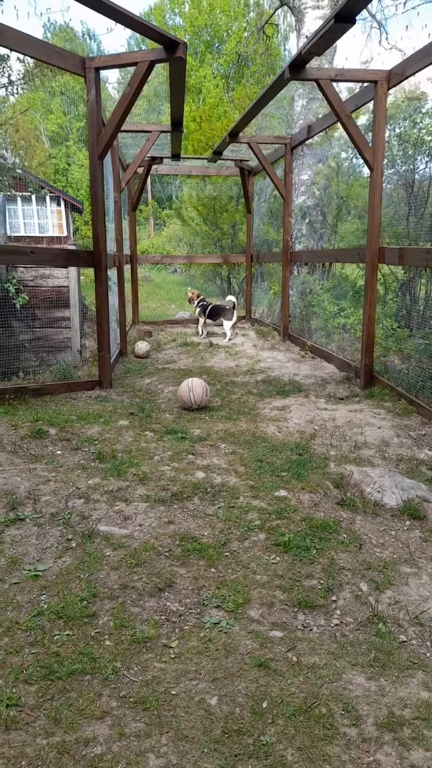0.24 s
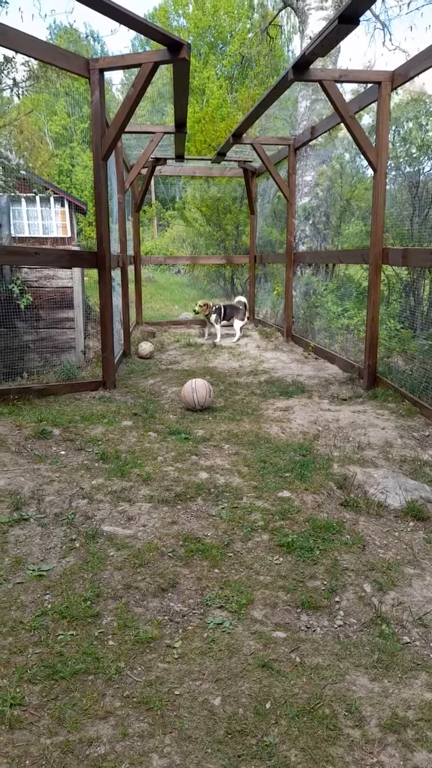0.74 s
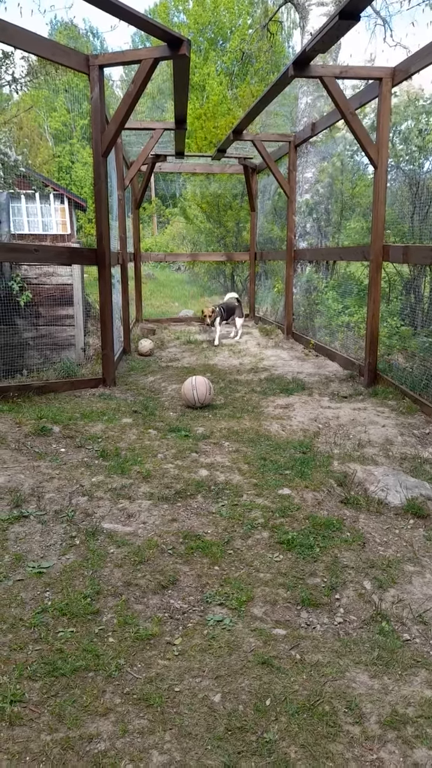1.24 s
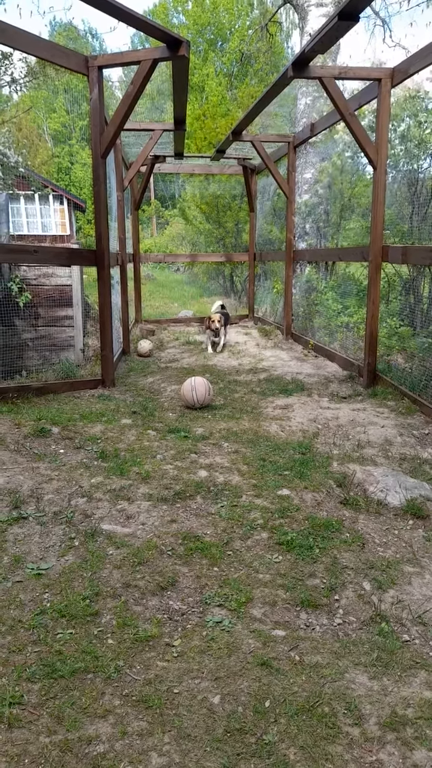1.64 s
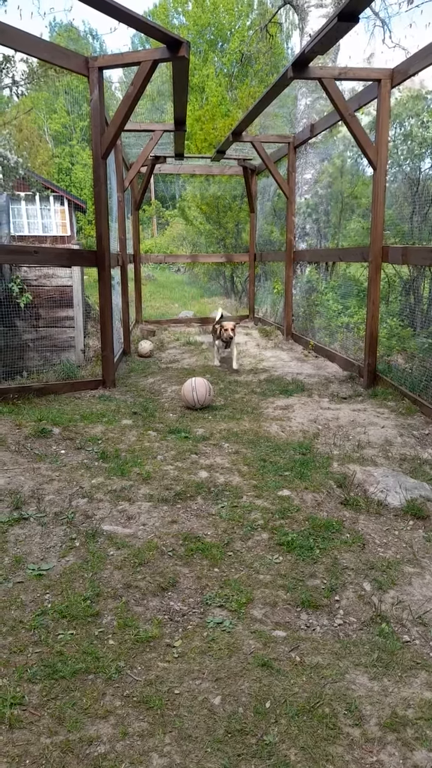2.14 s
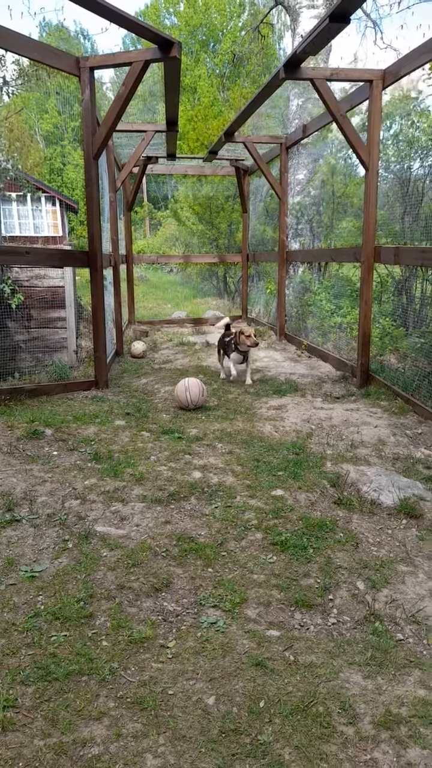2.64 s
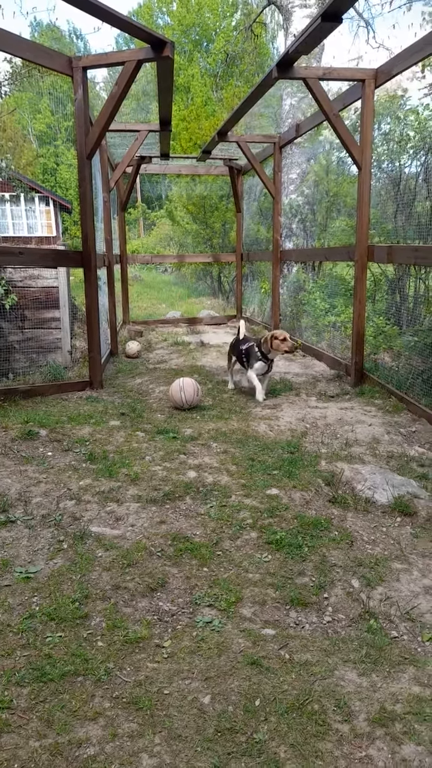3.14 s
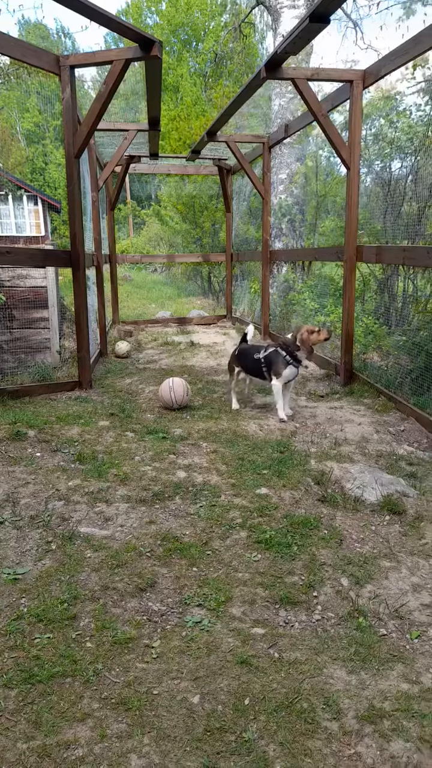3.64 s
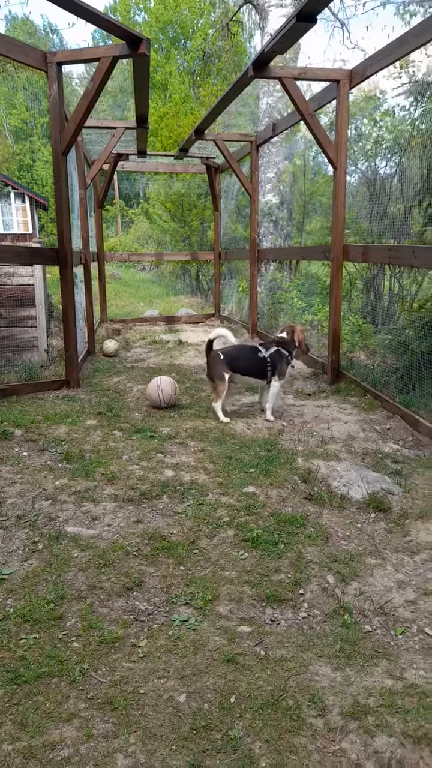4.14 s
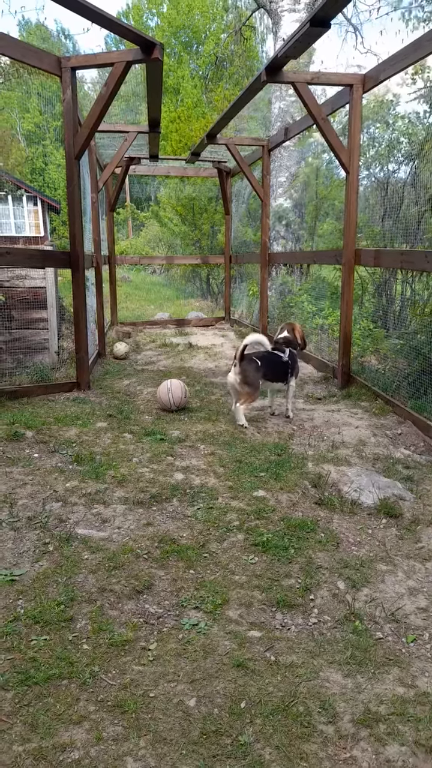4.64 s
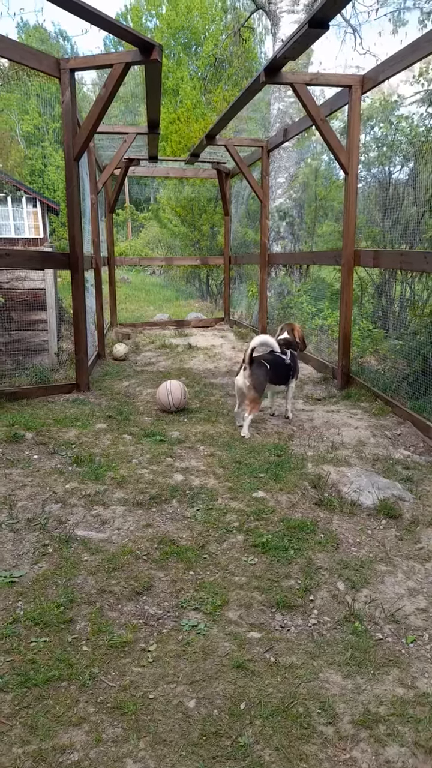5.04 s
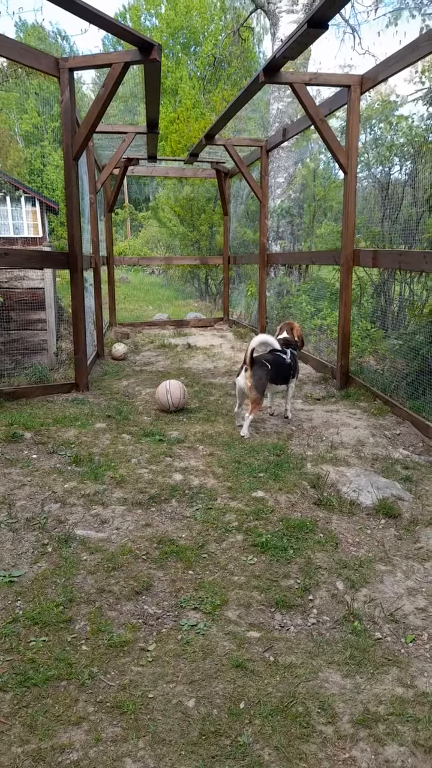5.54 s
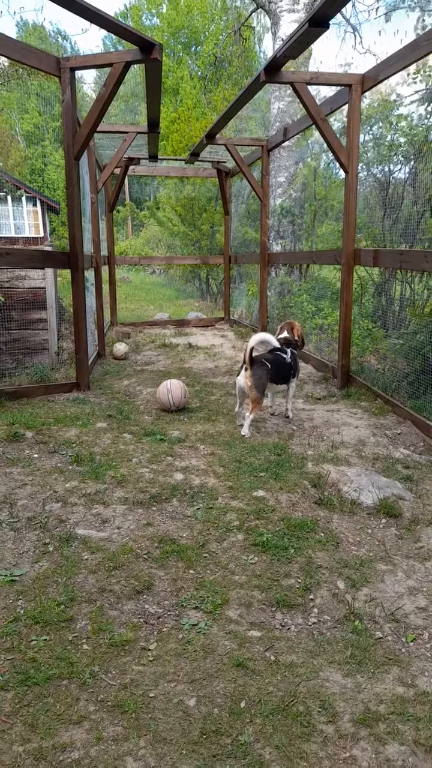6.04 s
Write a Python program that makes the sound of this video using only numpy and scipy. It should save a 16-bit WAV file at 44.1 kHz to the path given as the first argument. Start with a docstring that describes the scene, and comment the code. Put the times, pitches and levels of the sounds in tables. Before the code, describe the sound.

A dog's bay dominates the opening: a sudden high, cracking call, a quick second lower one, then a trailing growl. The rest is quiet: a short rumbling grumble, paws on earth, twig ticks, thin metallic collar jingles, then a long grumble that rises slightly and sags away. Gentle wind in leaves and faint bird whistles surround it. Open garden, short diffuse reflections, dog at a distance from a phone microphone.

```python
"""A small hound in an outdoor fenced run: a grumble breaks into a double bay, then two long closed-mouth grumbles.
A low rumble goes with the grumbles; collar tags tinkle, twigs tick, paws thud, a bird chirps, leaves rustle in wind.
The voice is harmonics, halfway lines and throat-shaped rasp; the bay adds pulses and second notes.
Tags, twigs and paws are decaying tones, chirps gliding tones, rustle and rumble shaped stereo noise.
Nearby walls and trees answer the voice with a decaying noise tail; a far slope returns the bay once, dulled."""
import sys
import numpy as np
from scipy import signal
from scipy.fft import rfft, irfft, next_fast_len
from scipy.io import wavfile
from scipy.ndimage import uniform_filter1d, map_coordinates

SR = 44100
rng = np.random.default_rng(int(sys.argv[2]) if len(sys.argv) > 2 else 0)


def unload_audio(sound):
    """Save the sound as a 16-bit wav file, at the path given as the first command line argument."""
    columns = np.transpose(np.atleast_2d(sound))
    # keep every value between -1 and 1, then stretch to whole-number steps
    steps = np.round(np.clip(columns, -1, 1) * 32767)
    wavfile.write(sys.argv[1], SR, steps.astype(np.int16))


N = 277389

# Open throat and mouth, resonances: (centre [Hz], width of one pass [Hz], level [dB])
THROAT_MODES = [(310, 95, -9.5), (542, 150, 7), (890, 140, -3.5), (1204, 67, -0.5), (1490, 100, -11.5),
                (1786, 50, -15.5), (2185, 40, -23), (3060, 47, -35.5), (3540, 230, -27), (4550, 180, -28.5),
                (6200, 340, -33.5)]
# Stereo likeness of the rustle: (frequency [Hz], left-right correlation [-1..1])
PORT_LIKENESS = [(30, .3), (70, 0.94), (180, 1), (550, 0.74), (1650, 0.7), (5000, 0.067), (15000, 0.067)]


def amp(db):
    """Gain of a level in dB."""
    return 10 ** (np.asarray(db) / 20)


def unit(x):
    """x at rms 1."""
    return x / np.sqrt(np.mean(x ** 2) + 1e-20)


def along(points, hz):
    """(Hz, value) points interpolated on a log frequency axis."""
    f, v = np.transpose(points)
    return np.interp(np.log(hz + 1), np.log(f + 1), v)


def curves(rows):
    """One value per sample for each column after the time."""
    s, *cols = np.transpose(rows)
    return [np.interp(np.arange(N) / SR, s, c) for c in cols]


def wobble(rate_hz):
    """A smooth random curve with rate_hz knots a second."""
    knots = rng.standard_normal(int(N * rate_hz / SR) + 4)
    return map_coordinates(knots, [np.arange(N) * rate_hz / SR])


def filtered(x, response):
    """x times a complex response of frequency."""
    m = next_fast_len(N + SR)
    return irfft(rfft(x, m) * response(np.fft.rfftfreq(m, 1 / SR)), m)[..., :N]


def resonances(modes):
    """Response of summed resonances, each applied twice for dark valleys."""
    def response(f):
        return sum(amp(db) * (1j * f * w / (c * c - f * f + 1j * f * w)) ** 2 for c, w, db in modes)
    return response


def rush(spectrum, patchy_db, alike=PORT_LIKENESS):
    """Stereo noise with patches of random gain; the mean of its channels has rms 1."""
    # Port balance: (frequency [Hz], left minus right [dB])
    tilt = [(30, 1), (70, -0.5), (180, -4), (550, -1.5), (1650, 0), (5000, -2.5), (15000, 4.5)]
    port_gap_samples = 6  # left leads
    z = signal.stft(rng.standard_normal((2, N)), nperseg=512)[2]
    field = uniform_filter1d(rng.standard_normal(z.shape[1:]), size=6, axis=0)
    patches = unit(uniform_filter1d(field, size=14, axis=1))
    pair = signal.istft(z * amp(patchy_db * patches), nperseg=512)[1][:, :N]

    def mid_side_gains(hz):
        turn = np.arccos(np.clip(along(alike, hz), -1, 1)) / 2
        return amp(along(spectrum, hz)) * np.array([np.cos(turn), np.sin(turn)])

    mid, side = filtered(pair, mid_side_gains)
    left, right = filtered(np.array([mid + side, mid - side]),
                           lambda hz: amp(along(tilt, hz) / 2 * [[1], [-1]]))
    both = np.array([left, np.roll(right, port_gap_samples)])
    return both / np.std(both.mean(0))


def foliage():
    """Turbulent rustle: one wind strength stirs near leaves, their top hiss and far trees."""
    # Near leaves: (time [s], level [dB])
    strength = [(0.0, -62.5), (.47, -63.5), (1.05, -65), (1.2, -67.5), (1.61, -67), (1.89, -62),
                (2.31, -61), (2.43, -63.5), (2.82, -63.5), (3.1, -65.5), (3.56, -63.5), (4.03, -62),
                (4.41, -64.5), (4.9, -65.5), (5.1, -67.5), (5.75, -68.5), (6.29, -69)]
    # Noise shapes of far trees, near leaves and top hiss: (frequency [Hz], relative level [dB])
    trees_shape = [(88, -31), (150, -16.5), (270, -5.5), (326, -0.5), (380, -3.5), (744, -3), (817, -5.5),
                   (1340, -9.5), (2500, -20), (3250, -45), (5500, -120)]
    leaves_shape = [(880, -14.5), (1500, -13), (2020, -6.5), (2430, -6.5), (3090, -4.5), (3500, -6.5),
                    (4050, -5.5), (4830, -7.5), (6280, -7.5), (8600, -30), (11200, -40), (18900, -120)]
    hiss_shape = [(4410, -9.5), (7500, -4.5), (8540, -10), (10600, -6), (12600, -6), (14600, -6.5),
                  (15100, -11), (15700, -9)]
    # growth: dB per dB of swing of the near leaves
    trees_db, trees_growth, trees_drift_db_per_s = -60, 0.68, 0.7456
    hiss_db, hiss_growth, hiss_drift_db_per_s = -67.5, 1.1, -.5
    leaves_db, = curves(strength)
    swing_db, t = leaves_db - leaves_db.mean(), np.arange(N) / SR
    gust = wobble(6.9)
    trees_level_db = trees_db + trees_growth * swing_db + trees_drift_db_per_s * t + 0.24 * gust
    leaves_level_db = leaves_db + 0.18 * gust
    hiss_level_db = hiss_db + hiss_growth * swing_db + hiss_drift_db_per_s * t + .7 * gust
    hiss_level_db = hiss_level_db + 0.56 * wobble(5.4)
    return (amp(trees_level_db) * rush(trees_shape, patchy_db=-0.08)
            + amp(leaves_level_db) * rush(leaves_shape, patchy_db=1.8)
            + amp(hiss_level_db) * rush(hiss_shape, patchy_db=1.7))


def bird():
    """Faint whistles from the trees: short gliding tones with a wandering phase."""
    # (time [s], length [s], start pitch [Hz], end pitch [Hz], level [dB])
    chirps = [(.3, 0.067, 6270, 6140, -63), (3.183, 0.022, 4370, 4000, -65), (3.205, .07, 3820, 4180, -68),
              (3.565, 0.016, 4300, 4100, -61), (2.932, 0.054, 2730, 2660, -68),
              (3.132, .05, 2700, 2650, -66)]
    out = np.zeros(N)
    for s, length_s, from_hz, to_hz, db in chirps:
        u = np.linspace(0, 1, round(length_s * SR))
        glide = 2 * np.pi * np.cumsum(from_hz + (to_hz - from_hz) * u) / SR
        wander = np.cumsum(rng.normal(0, 0.064, len(u)))
        out[round(s * SR):][:len(u)] += amp(db) * np.sin(np.pi * u) * np.sin(glide + wander)
    return out


def twigs():
    """Ticks: tones with a wandering phase that die within a few cycles."""
    # (time [s], level before the envelope [dB], centre [Hz])
    ticks = [(2.449, -34, 7000), (2.755, -46, 4800), (3.301, -34, 2360), (3.894, -33, 13000),
             (4.243, -54, 10980)]
    out, t = np.zeros(N + SR), np.arange(SR // 8) / SR
    for s, db, hz in ticks:
        wander = np.cumsum(rng.normal(0, 1.6 * hz / SR, len(t)))
        envelope = np.exp(-t * hz / 1.6) * np.tanh(t * hz / .5)
        out[round(s * SR):][:len(t)] += amp(db) * np.sin(2 * np.pi * hz * t + wander) * envelope
    return out


def paws():
    """Thuds on earth: damped tones with a soft onset."""
    # Level before a 6 dB lift and the envelope: (time [s], level [dB], pitch [Hz])
    thumps = [(1.619, -55, 96.9), (2.44, -47, 101.3), (2.48, -52, 73), (2.613, -47, 61.5),
              (2.717, -60, 110), (2.73, -52.5, 601), (2.81, -54, 90)]
    out, t = np.zeros(N + SR), np.arange(SR // 8) / SR
    envelope = np.exp(-t / 0.017) * (1 - np.exp(-t / 0.0069))
    for s, db, hz in thumps:
        out[round(s * SR):][:len(t)] += amp(db + 6.0) * np.sin(2 * np.pi * hz * t) * envelope
    return out


def collar_tags():
    """Metal tags ring high and short in three decaying modes, balanced anew at each touch."""
    # Level before a 1.5 dB lift and the onset: (time [s], level [dB], gain of the upper two modes [dB])
    touches = [(2.298, -60, -10), (2.648, -54, -3), (2.672, -64, -7), (3.088, -59, 3), (3.484, -60, 5),
               (3.522, -48.5, 14), (3.545, -53.5, 6), (3.575, -68, -5), (3.914, -60, -6), (4.01, -64, -8)]
    # (frequency [Hz], relative level [dB], t60 [s])
    modes = [(10420, 5, 0.083), (14000, 4, .065), (15300, 2, .065)]
    out, t = np.zeros(N + SR), np.arange(SR // 8) / SR
    onset = 1 - np.exp(-(t / .017) ** 2)
    for s, db, upper_db in touches:
        ring = np.zeros(len(t))
        for (hz, level_db, t60_s), gain_db in zip(modes, [0, upper_db, upper_db]):
            decay = amp(level_db + gain_db + rng.normal(0, 2.1) - 60 * t / t60_s)
            wander = np.cumsum(rng.normal(0, 0.078, len(t)))
            ring += decay * np.sin(2 * np.pi * hz * t + wander)
        out[round(s * SR):][:len(t)] += amp(db + 1.5) * ring * onset
    return out


def small_sounds():
    """Tags, twigs and paws reach the left port four samples before the right."""
    mono = collar_tags() + twigs() + paws()
    return np.array([mono[4:N + 4], mono[:N]])


def chest_rumble():
    """Low rumble: lumpy deep noise, strongest while the dog grumbles, probably from its chest."""
    # Level before a 5.5 dB lift: (time [s], level [dB])
    strength = [(0.0, -71), (.47, -70), (.88, -67.5), (1.05, -63), (1.17, -77), (1.5, -81), (1.79, -64),
                (2.1, -52), (2.43, -68.5), (2.82, -67), (3.08, -72.5), (3.56, -71), (4.03, -64),
                (4.41, -66), (4.59, -66), (4.9, -62.5), (5.1, -72), (6.29, -74)]
    # Noise shape: (frequency [Hz], relative level [dB])
    rumble_shape = [(12, -61), (20, -38.5), (51, -7.5), (97, 2), (118, 0.5), (140, -9), (171, -3.5),
                    (250, -23.5), (320, -25), (550, -120)]
    # (frequency [Hz], left-right correlation [-1..1])
    likeness = [(30, .3), (60, .55), (130, .9)]
    lumps = amp(4.0 * wobble(9))
    return amp(curves(strength)[0] + 5.5) * lumps * rush(rumble_shape, patchy_db=0.0, alike=likeness)


def yard(x, delay_s):
    """The diffuse answer of walls and trees; each frequency dies at its own speed."""
    # (frequency [Hz], t60 [s])
    decay = [(150, 0.054), (500, 0.42), (1500, 0.26), (6000, 0.089)]
    hz, t, z = signal.stft(rng.standard_normal((2, SR // 2)), SR, nperseg=256)
    tail = signal.istft(z * amp(-60 * t / along(decay, hz)[:, None]), SR, nperseg=256)[1]
    late = np.pad(x, (round(delay_s * SR), 0))[None]
    return signal.fftconvolve(late, tail / np.linalg.norm(tail[0]), axes=1)[:, :N]


def far_slope(x):
    """One late return, narrowed to a band round 510 Hz, with a flickering level."""
    def response(hz):
        band = 1 / (1 + (np.log(hz / 510 + 1e-9) / .11) ** 4)
        return np.exp(-2j * np.pi * hz * .68) * band  # 0.68 s late
    return filtered(x, response) * amp(3.7 * wobble(40.46))


def catches():
    """Gain of the voice: brief dips where the folds lose their swing."""
    # (time [s], half width to 1/e of the depth [s], depth [dB])
    breaks = [(0.213, 0.0032, 6.5), (0.23, 0.0057, 5.5), (.243, 0.0027, 2), (.33, 0.007, 14),
              (0.371, 0.0051, 14.5), (0.466, 0.0064, 5.5), (0.485, 0.0015, 7.5), (.499, 0.0014, 9),
              (0.513, 0.0062, 8.5), (0.533, 0.0047, 7.5), (0.543, 0.0013, 17.5), (.56, 0.009, 0.5),
              (0.613, 0.0087, 14), (0.631, 0.0025, 8.5), (0.647, .003, 4), (2.115, .012, 8)]
    t = np.arange(N) / SR
    return amp(-sum(abs(db) * np.exp(-((t - s) / width_s) ** 2) for s, width_s, db in breaks))


def second_notes(jitter):
    """A second steady pitch sounds briefly beside the gliding bay and beats with it."""
    # (time [s], length [s], pitch [Hz], peak level [dB])
    notes = [(.2, 0.064, 503.7, -21), (0.471, 0.088, 505.2, -21), (0.616, .05, 420.6, -26),
             (.665, 0.043, 410, -39)]
    out = np.zeros(N)
    unsteady, shimmer = 1 + jitter * wobble(90), amp(1.3 * wobble(70))
    for s, length_s, hz, db in notes:
        at = round(s * SR) + np.arange(round(length_s * SR))
        phase = 2 * np.pi * np.cumsum(hz * unsteady[at]) / SR
        swell = np.sin(np.linspace(0, np.pi, len(at)))
        tone = np.sin(phase) + amp(-16) * np.sin(2 * phase)
        out[at] += np.sqrt(2) * amp(db) * shimmer[at] * swell * tone
    return out


def undertone(jitter):
    """A second, slower swing of the folds: sharp pulses through the open throat give bright overtones."""
    # Level before a 4.5 dB lift: (time [s], length [s], pitch [Hz], level [dB], hold [s])
    swings = [(0.183, 0.12, 307.7, -28, 0.07), (.475, .135, 219.7, -50, .07)]
    # swells and scoops up to pitch, holds, fades
    attack_s, start_db, fade_db_per_s, scoop_fraction = .025, -27, 199, .07
    out, unsteady = np.zeros(N), 1 + jitter * wobble(120)
    for s, length_s, hz, db, hold_s in swings:
        t = np.arange(N) / SR - s
        early = np.clip(1 - t / attack_s, 0, 1)
        fading_s = np.clip(t - attack_s - hold_s, 0, length_s)
        level_db = db + start_db * early - fade_db_per_s * fading_s
        cycles = np.cumsum(hz * (1 - scoop_fraction * early) * unsteady) / SR
        pulses = np.diff(np.floor(cycles), prepend=0) * amp(1.5 * wobble(200))
        on = np.clip(np.minimum(t, length_s - t) / 0.011, 0, 1)
        out += on * amp(level_db + 4.5) * unit(filtered(pulses, resonances(THROAT_MODES)))
    return out


def voice(phrases, timbre, modes, rasp_band_hz, jitter, tremor, shimmer_db, blur_rad, fall_db):
    """Vocal folds: harmonics, lines halfway where alternate cycles differ, and rasp through the throat."""
    fade, multiples = 200, np.array([.5, 1, 1.5, 2, 2.5, 3, 4])  # fade in samples
    tremble = np.sin(2 * np.pi * 20.5 * np.arange(N) / SR + .7 * wobble(5))
    unsteady = 1 + jitter * wobble(90) + tremor * tremble  # the pitch flutters
    shimmer = amp(shimmer_db * (np.array([wobble(80) for _ in multiples]) + wobble(130)))
    # the halfway lines lock loosely
    drift = blur_rad * np.array([wobble(70) * (k % 1 > 0) for k in multiples])
    air = filtered(rng.standard_normal(N), resonances(modes))
    air /= np.std(filtered(air, lambda f: (f > rasp_band_hz[0]) & (f < rasp_band_hz[1])))
    pitch_hz, *over_db = np.transpose(timbre)
    out, handed_phase = np.zeros(N), 0
    for phrase in phrases:
        s, *columns = np.transpose(phrase)
        at = np.arange(max(round(s[0] * SR) - fade, 0), round(s[-1] * SR) + fade)
        hz, first_db, halfway_db, bright_db = [np.interp(at / SR, s, c) for c in columns]
        second_db, sub_db, rasp_db = [first_db + np.interp(hz, pitch_hz, db) for db in over_db]
        between_db = first_db + halfway_db
        second_db, rasp_db = second_db + bright_db, rasp_db + bright_db
        phase = handed_phase + 2 * np.pi * np.cumsum(hz * unsteady[at]) / SR
        handed_phase = phase[-2 * fade - 1]  # the folds swing on into the next phrase
        levels_db = [sub_db, first_db, between_db, second_db,
                     between_db - fall_db, second_db - fall_db, second_db - 2 * fall_db]
        lines = amp(levels_db) * shimmer[:, at] * np.sin(multiples[:, None] * phase + drift[:, at])
        stack = np.sqrt(2) * np.sum(lines, axis=0)
        puffs = 1 + 0.13 * np.cos(phase / 2)  # with the stronger cycles
        rasp = amp(rasp_db - 6.0) * air[at] * puffs
        edge = np.minimum(at - at[0] if at[0] else 2 * fade, at[-1] - at) / (2 * fade)
        out[at] += np.clip(edge, 0, 1) * (stack + rasp)
    return out


def dog():
    """The voice reaches the left port first; near surfaces and one far, dull echo follow."""
    # One table a phrase: (time [s], pitch [Hz], fundamental level [dB],
    # halfway lines over the fundamental [dB], brightness added to octave and rasp [dB])
    bay_phrases = [
        [(0.0, 160.6, -60.5, -2, 2.5), (.116, 165.2, -54.5, -4, 1), (.164, 199.4, -44.5, -7, -1),
         (.18, 322.2, -32, -24, -4.5), (.195, 494.4, -18, -31.5, -3.5), (.208, 548.8, -12.5, -30.5, -5.5),
         (.228, 591, -22.5, -17, 4.5), (.238, 490.7, -14.5, -27, 1), (.261, 498.5, -16, -19.5, 3),
         (.29, 500, -13.5, -18.5, -3), (.318, 496, -16, -19, -8), (.329, 490, -31, -4, 0),
         (.341, 455, -27, -8, -2), (.353, 426.6, -20.5, -11.5, -10), (.385, 317.2, -24.5, -8, 1.5),
         (.415, 270.5, -36.5, -13.5, -1)],
        [(.415, 268.2, -40, -14, -1), (.462, 336.8, -22.5, -22, 3.5), (.468, 346, -34.5, -10.5, 3),
         (.474, 431.5, -24.5, -13, -1.5), (.502, 428.7, -18, -4.5, -5.5), (.54, 433.3, -27, -0.5, 3.5),
         (.565, 444, -28, -15.5, 8.5), (.594, 433.7, -22.5, -16, -3), (.606, 411, -33, -8, 0),
         (.621, 361.7, -34, -9.5, -11), (.645, 313, -30.5, -8.5, 1), (.68, 220.4, -41, -12, -0.5),
         (.703, 176, -43, -20, -4)],
        [(.703, 177, -44.5, -18.5, -5), (.75, 153, -49.5, -22, 0), (.83, 153.3, -55.5, -6, -1),
         (.886, 159.3, -53.5, -8, -2.5), (.956, 149, -56.5, -6, 0), (1.072, 125.7, -50.5, -16, 4),
         (1.122, 122.5, -63.5, -3, -2), (1.17, 117, -65, -15, -4)],
    ]
    grumble_phrases = [
        [(1.67, 101.3, -70, -7.5, 0), (1.704, 123.4, -54.5, -6.5, -8), (1.765, 155, -48, -7, -1.5),
         (1.848, 134, -51.5, -14, 5), (1.936, 140.4, -45.5, -13, -2.5), (2.0, 165.4, -44.5, -0.5, -2.5),
         (2.06, 161.1, -40.5, -24, 4.5), (2.11, 145.8, -47.5, 2, 2.5), (2.184, 157.1, -45.5, -19, -1),
         (2.248, 176, -38, -27, -9), (2.315, 154.8, -45, -14, 1.5), (2.34, 153.3, -74, 1, 0)],
        [(3.61, 115.2, -57, -2, 0), (3.656, 139.7, -45.5, -5.5, -1.5), (3.768, 154.7, -44, -2, 3.5),
         (3.928, 167.5, -43, -12, 5), (4.046, 181, -40, -2, 3.5), (4.116, 189.5, -37, -5.5, -2.5),
         (4.184, 170.4, -43.5, -2, 3), (4.234, 168, -49, -9.5, -6), (4.388, 159.2, -47, -5, -3),
         (4.52, 147.8, -49, -5.5, -4.5), (4.698, 132.5, -50.5, -8, -3), (4.85, 142.6, -48, -6, -5),
         (4.97, 132.6, -53.5, -6.5, -4), (5.096, 111.5, -55, -4.5, -1), (5.214, 109.2, -61, -12, 0),
         (5.25, 108.8, -72, -8, 2)],
    ]
    # Timbre against pitch, over the fundamental, rasp before a 6 dB cut:
    # (pitch [Hz], octave [dB], line at half pitch [dB], rasp [dB])
    timbre_open = [(119, -6, -9.5, -11.5), (155, 5.5, -23, -6.5), (200, -0.5, -28.5, -20.5),
                   (280, -2, -33.5, -23), (340, -6, -47, -20.5), (423, -14.5, -30.5, -26),
                   (502, -17.5, -30.5, -10), (580, -11, -13.5, -8.5)]
    timbre_shut = [(110, -18.5, -13, -4), (130.5, 1.5, -11, -12), (153.4, -3.5, -24.5, -11.5),
                   (175, -6, -19.5, -11), (186, -5.5, -20, -9.5)]
    # Throat with the mouth shut: (centre [Hz], width of one pass [Hz], level [dB])
    snout_modes = [(252, 260, 3.5), (470, 328, -12), (620, 144, 3.5), (1190, 470, -9.5)]
    # Full lead of the left port, before the share: (frequency [Hz], phase [rad])
    lead = [(100, .3), (180, .55), (300, 0.94), (500, 1.3), (800, 1.43), (1300, 0.62), (4000, 2.13)]
    bay_lead_share, grumble_lead_share = 0.97, 0.49  # the dog has come round nearer the middle

    bay = voice(bay_phrases, timbre_open, THROAT_MODES, (750, 2400),
                jitter=.018, tremor=.008, shimmer_db=1, blur_rad=.5, fall_db=18)
    first_grumble = voice(grumble_phrases[:1], timbre_shut, snout_modes, (420, 900),
                          jitter=.025, tremor=.075, shimmer_db=1.3, blur_rad=2.5, fall_db=16)
    second_grumble = voice(grumble_phrases[1:], timbre_shut, snout_modes, (420, 900),
                           jitter=.025, tremor=.02, shimmer_db=1.1, blur_rad=2.5, fall_db=17)
    dips = catches()
    bay = dips * (bay + undertone(jitter=.03) + second_notes(jitter=.015))
    grumbles = dips * (first_grumble + second_grumble)

    def ports(x, share):
        return filtered(x, lambda hz: np.exp(.5j * share * along(lead, hz) * [[1], [-1]]))

    direct = ports(bay, bay_lead_share) + ports(grumbles, grumble_lead_share)
    direct = direct * amp([[-.7], [.9]])  # left, right
    return direct + amp(-15.0) * yard(bay + grumbles, delay_s=.015) + amp(-37.5) * far_slope(bay)


def scene():
    """Everything that reaches the two microphone ports."""
    return foliage() + bird() + small_sounds() + chest_rumble() + dog()


def record(dry):
    """The phone keeps nothing above its band limit."""
    top_hz = 15890
    return filtered(dry, lambda hz: hz < top_hz)


dry = scene()
out = record(dry)
unload_audio(out)
```